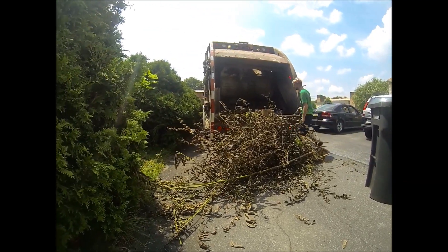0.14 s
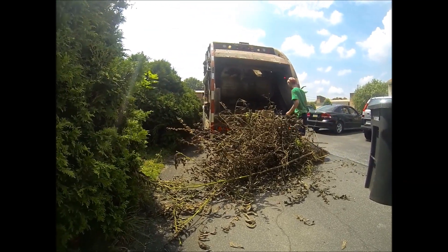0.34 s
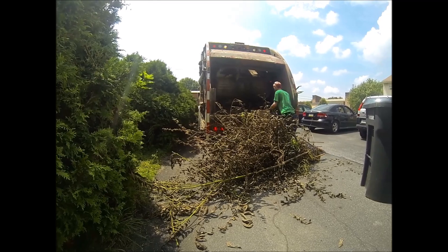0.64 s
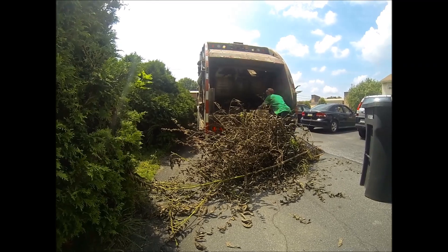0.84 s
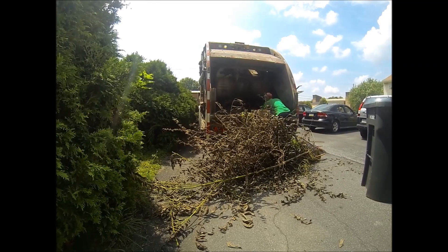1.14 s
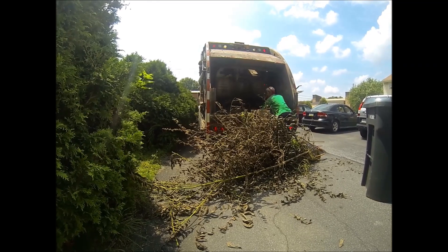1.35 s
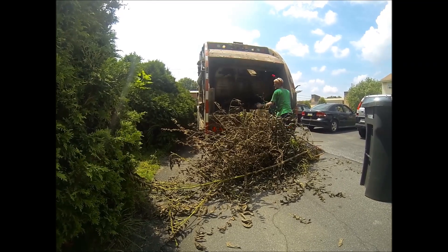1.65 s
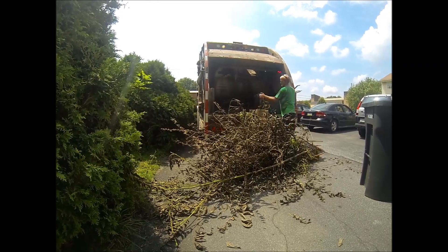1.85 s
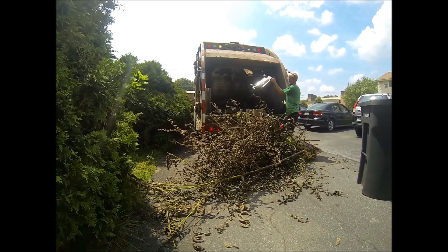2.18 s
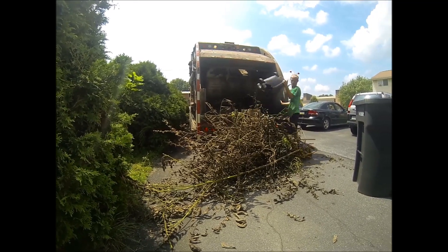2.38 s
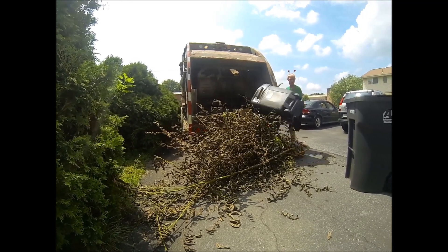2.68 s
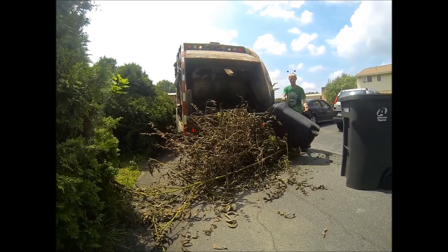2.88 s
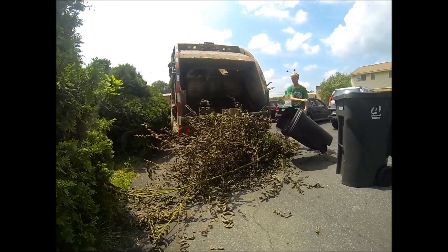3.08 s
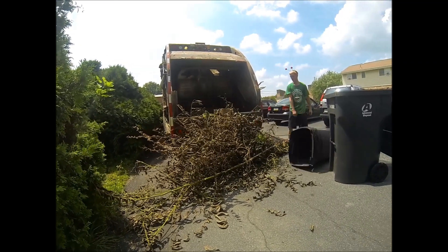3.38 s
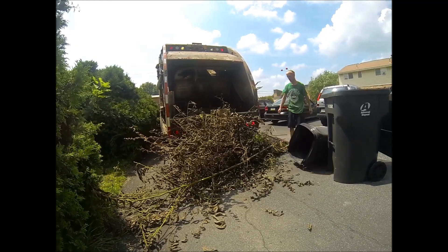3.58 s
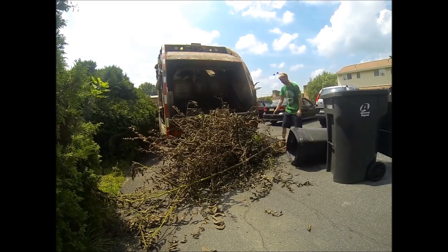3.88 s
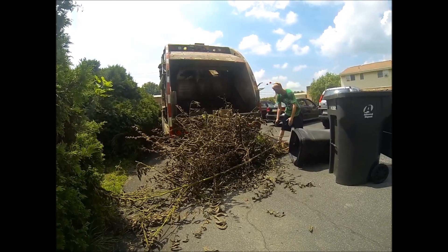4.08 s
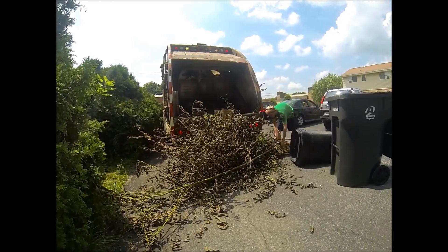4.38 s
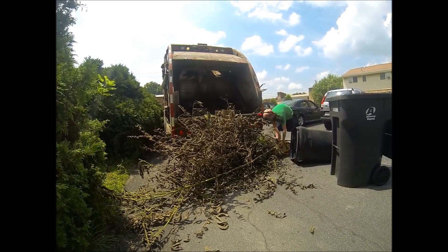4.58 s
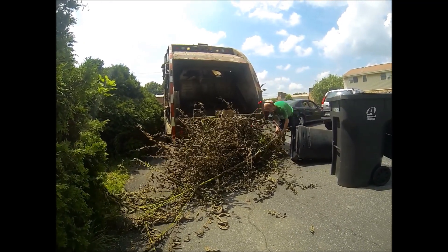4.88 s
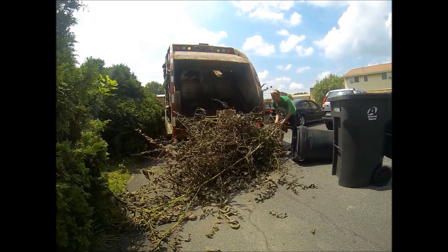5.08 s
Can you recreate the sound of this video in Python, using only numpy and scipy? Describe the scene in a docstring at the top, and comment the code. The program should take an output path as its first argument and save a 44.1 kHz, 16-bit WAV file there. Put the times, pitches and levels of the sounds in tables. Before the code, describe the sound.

A refuse truck idles with a steady low drone on a street. A plastic bin knocks a few times against its hopper, then hits the asphalt with one very loud slam and bounces and skids with hollow booms. The engine dips under the slam and swells back. Near the end, dry branches and leaves rustle and crackle as they are dragged. The microphone picks up a short outdoor echo.

```python
"""At the kerb of a street, a refuse truck idles behind a heap of cut brush and a cricket trills in the hedge.
A worker knocks a plastic bin empty against the hopper and throws it down: its thin wall slams, bounces
and skids on the asphalt and its hollow booms. He then drags brush together, leaves hissing, twigs snapping.
The slam makes a gain control duck the mix, and the engine's drone swells back slowly."""
import sys
import numpy as np
from scipy import signal
from scipy.fft import rfft, irfft, next_fast_len
from scipy.io import wavfile
from scipy.ndimage import uniform_filter1d, minimum_filter1d, map_coordinates

SR = 44100
rng = np.random.default_rng(int(sys.argv[2]) if len(sys.argv) > 2 else 0)


def store_pcm(level_fs):
    """Save levels as 16-bit WAV."""
    pcm = np.round(np.clip(level_fs, -1, 1) * 32767).astype(np.int16)
    wavfile.write(sys.argv[1], SR, np.atleast_2d(pcm).T)


N = 230728
TIME = np.arange(N) / SR


# the bin's hits on truck and ground: start_s, strength_db, extra_bass_db, extra_treble_db, thud_t60_s
BIN_HITS = [(0.88, -30, -7, 0, 0.17), (1.222, -25.5, -2.5, -8, 0.13), (1.244, -24.5, 1.5, -8, 0.15),
            (1.528, -34, 4, 6, 0.21), (2.725, -23, -10, -5, .1), (2.765, -17.5, -1, -1, 0.19),
            (2.8515, 10.5, -13.5, -8, 0.057), (2.902, -21, 14.5, 6, .22), (3.005, -23.5, 6, -5, .15),
            (3.212, -7, 4.5, 2, 0.17), (3.229, -6, 3.5, -5, 0.09), (3.273, -12.5, -2.5, 3, 0.24),
            (3.302, -9, 0, 3, 0.11), (3.382, -17, -5, 18, 0.071), (3.408, -19.5, 9.5, 8.5, 0.16),
            (3.472, -22, 5.5, 2, 0.25), (3.604, -23.5, 0, 7.5, 0.28), (3.667, -28, 7, 18.5, 0.16),
            (3.77, -28, 3.5, 10, 0.1), (3.825, -26.5, -2.5, 6.5, 0.19), (4.01, -26.5, 1.5, 2.5, 0.11)]
# low, mid and high layers of a hit: freq_hz, density_db
THUD_COLOUR = [(60, -36), (130, 8), (200, 6), (420, -1), (700, -6), (1200, -32.5), (3000, -63.5)]
CLACK_COLOUR = [(250, -36.5), (600, -13), (950, 2), (1350, -1.5), (1650, -2), (2050, -0.5), (2400, -16.5),
                (3200, -18), (5000, -36.5), (9000, -61)]
TICK_COLOUR = [(1200, -34.5), (2600, 10), (3600, 0.5), (4800, 1), (5600, -4), (7600, -11), (9300, -12),
               (12500, -19), (15000, -28)]
# resonances of the hollow bin: pitch_hz, level_db, t60_s
BIN_MODES = [(159, -8.5, .35), (188, -15, .2), (236, -12, .2), (291, 1.5, .18), (352, -16, .15),
             (490, -13, .18), (618, -6, .14), (943, -14, .14), (1310, -14, .12), (1800, -15, .1)]
# the bin scraping along: start_s, length_s, level_db
BIN_SLIDES = [(1.245, 0.038, -32), (1.44, 0.21, -36), (1.88, 0.26, -38), (2.67, 0.14, -36),
              (2.755, 0.15, -20.5), (2.9, 0.2, -26.5), (3.22, 0.25, -22), (3.45, .065, -28),
              (3.63, 0.078, -25)]
def plastic_bin(thud_db=7.0, clack_db=3.0, tick_db=-17.5, boom_db=8.0, skid_db=-1):
    """The thin wall thuds, clacks and ticks, heavy hits boom in the hollow, and the sliding rim grates."""
    starts, strength, bass, treble, _ = np.transpose(BIN_HITS)
    thud = wall_rattle(strength + bass, THUD_COLOUR, rng.standard_normal(N), t60_scale=1, softness=0.17)
    grit = grains(per_s=8000, spread_db=1)
    clack = wall_rattle(strength, CLACK_COLOUR, grit, t60_scale=0.72, softness=0.39)
    hiss = rng.standard_normal(N)
    tick = wall_rattle(strength + treble, TICK_COLOUR, hiss, t60_scale=0.84, softness=0.21)
    boom_hits = zip(starts, 1.95 * (strength + bass))  # the boom grows faster than the thud
    boom = ring(boom_hits, BIN_MODES, scatter_db=-1.0, attack_s=0.00073)
    slide = strokes(BIN_SLIDES, attack_s=0.0075, release_s=0.021)
    skid = slide * amp(2.2 * wobble(70)) * coloured(grains(per_s=2000, spread_db=1), CLACK_COLOUR)
    impacts = amp(thud_db) * thud + amp(clack_db) * clack + amp(tick_db) * tick
    return impacts + amp(boom_db) * boom + amp(skid_db) * skid


def wall_rattle(levels_db, colour, texture, t60_scale, softness):
    """One layer of the bin's hits: a dense rattle of the wall that dies away after each."""
    power, t = np.zeros(N), np.arange(SR // 2) / SR
    for (start_s, *_, t60_s), db in zip(BIN_HITS, levels_db):
        rise_s = softness * t60_s ** 2  # glancing hits last longer and build more slowly
        decay = amp(db - 60 * (t - rise_s) / (t60_s * t60_scale))
        add(power, start_s, (decay * (1 - np.exp(-t / rise_s))) ** 2)
    return np.sqrt(power) * coloured(texture, colour)


# chirps of rubbing plastic: centre_s, pitch_hz, level_db, half_length_s
PLASTIC_SQUEAKS = [(1.315, 3030, -45, 0.011), (1.47, 3230, -42, 0.014), (2.246, 1470, -31, 0.0073),
                   (2.69, 2040, -42, 0.01), (3.119, 1960, -18.5, 0.0041), (3.28, 1805, -10, 0.0056)]
def squeaks(waver=.04, overtone_db=-24):
    """Plastic sticks and slips in brief tones of unsteady pitch."""
    out = np.zeros(N)
    for centre_s, hz, db, half_length_s in PLASTIC_SQUEAKS:
        phase = wavering_phase(hz, waver, per_s=600)
        tone = unit(np.sin(phase) + amp(overtone_db) * np.sin(2 * phase))
        out += amp(db) * np.exp(-((TIME - centre_s) / half_length_s) ** 2) * tone
    return out


# knocks on the hopper's sill: start_s, level_db
SILL_KNOCKS = [(.910, -12.5), (.920, -16), (.940, -26)]
# resonances of the hopper: pitch_hz, level_db, t60_s
HOPPER_MODES = [(285, -8, .07), (404, 0, .075), (470, -8, .06), (560, -7, .08), (650, -11, .07),
                (1050, -17, .06)]
def hopper():
    """The hopper rings briefly as the bin strikes its sill."""
    return ring(SILL_KNOCKS, HOPPER_MODES, scatter_db=2.5, attack_s=0.00081)


# shoves against twigs and dry leaves: start_s, length_s, level_db
BRUSH_PUSHES = [(.88, 0.079, -61.5), (1.3, 0.65, -60), (1.44, 0.027, -55), (1.53, 0.11, -54),
                (1.75, 0.084, -52), (2.18, 0.072, -54), (2.4, 0.1, -59), (2.58, 0.082, -51.5),
                (2.68, 0.11, -43), (2.755, 0.11, -33.8), (2.88, .2, -50), (3.105, .08, -41),
                (3.285, .04, -41), (3.665, 0.027, -40)]
# swell of dragging the heap together: time_s, level_db
DRAG_SWELL = [(3.6, -63), (4.18, -60), (4.28, -54), (4.47, -54.5), (4.65, -43), (5, -41), (5.2, -35)]
# tone of lightly pushed leaves and of dragged twigs: freq_hz, density_db
LEAF_COLOUR = [(200, -15.5), (1100, 7.5), (2000, 8), (2600, 1), (3400, 1), (5500, -5.5), (7500, -12),
               (9300, -8.5), (12500, -18), (15000, -23)]
TWIG_COLOUR = [(200, -14.5), (500, -10), (1100, 8.5), (2000, 4.5), (2500, 0.5), (3300, 5), (4600, -4),
               (5500, -2.5), (6500, -10.5), (7900, -14), (9200, -10.5), (11500, -16), (12700, -20),
               (15000, -24)]
def brush(drag_db=5, push_db=4, snap_db=-11, clump_db=1, stir_db=-61.5):
    """Dry leaves hiss in clumps, light at a push and fuller in a drag, with twigs ticking among them."""
    push = amp(push_db) * strokes(BRUSH_PUSHES, attack_s=0.0093, release_s=.025)
    drag = amp(drag_db) * np.hypot(amp(curve(DRAG_SWELL)), amp(stir_db))  # the heap always stirs faintly
    crackle = grains(per_s=9000, spread_db=2.5) * amp(clump_db * wobble(60))
    rustle = push * coloured(crackle, LEAF_COLOUR) + drag * coloured(crackle, TWIG_COLOUR)
    return rustle + amp(snap_db) * np.hypot(push, drag) * twig_snaps()


def twig_snaps(centre_hz=2800, spread_octaves=1.1, decay_cycles=6, count=1200):
    """Each twig that gives way rings for a few cycles at its own pitch."""
    out, t = np.zeros(N), np.arange(SR // 25) / SR
    for when, pitch, size in rng.random((count, 3)):
        hz = centre_hz * 2 ** (spread_octaves * (2 * pitch - 1))
        add(out, when * N / SR, size ** 2 * np.sin(2 * np.pi * hz * t) * np.exp(-hz * t / decay_cycles))
    return unit(out)


# idle speed: time_s, firing_hz
IDLE_SPEED = [(0, 32.6), (.9, 33.4), (1.7, 33), (2.6, 33.2), (4, 33.14), (5.2, 33.2)]
# partials of the exhaust drone: firing_multiple, level_db
EXHAUST_ORDERS = [(1, -3), (1.5, -15.5), (2, 0), (2.5, -34), (3, 1.5), (3.5, -29), (4, -19), (4.5, -31.5),
                  (5, -58.5), (6, -1.5), (7, -22), (9, -19), (10, -29), (11, -29), (12, -23.5), (14, -32),
                  (15, -31)]
# noise bed of block, pump and fan: freq_hz, density_db
MACHINE_COLOUR = [(20, -6), (45, -4), (120, 4.5), (260, -5), (400, -11.5), (700, -19.5), (1030, -15.5),
                  (1250, -21), (1520, -19), (2100, -26.5), (2750, -36), (3500, -36), (7500, -63.5),
                  (15000, -73.5)]
def engine(drone_db=-14.5, machine_db=-26, pump_db=-50, pump_hz=1055, flutter_hz=14.0):
    """Exhaust pulses drone over machine noise that throbs with each firing, and a faint pump whine."""
    firing = wavering_phase(curve(IDLE_SPEED), 0.0021, per_s=7)
    dispersion = 1.11  # the pipe smears each pulse, evening the chug into a drone
    drone = sum(amp(db + 0.13 * wobble(21)) * np.cos(order * firing + dispersion * order ** 2)
                for order, db in EXHAUST_ORDERS)
    flutter = 0.14 * np.cos(2 * np.pi * flutter_hz * TIME)
    throb = 1 + 0.047 * np.cos(firing) + 0.047 * np.cos(2.5 * firing) + flutter
    machine = coloured(rng.standard_normal(N), MACHINE_COLOUR) * throb * amp(0.33 * wobble(8.5))
    pump = np.sin(wavering_phase(pump_hz, 0.023, per_s=90)) * amp(5.5 * wobble(25))
    return amp(machine_db) * machine + amp(pump_db) * unit(pump) - amp(drone_db) * unit(drone)


def cricket(stroke_hz=48, pitch_hz=6445, level_db=-70.2, overtone_db=-6):
    """Each wing stroke is a short, slightly unsteady tone."""
    stroke = np.maximum(np.sin(wavering_phase(stroke_hz, 0.011, per_s=6.7)), 0)
    phase = wavering_phase(pitch_hz, 0.0032, per_s=250)
    return amp(level_db) * unit(stroke * (np.sin(phase) + amp(overtone_db) * np.sin(2 * phase)))


# reverb time of the street: freq_hz, t60_s
STREET_DECAY = [(150, 1), (1500, 0.25), (5000, 0.11), (12000, .2)]
def street(x, predelay_s=.012):
    """The truck, cars and house fronts scatter a short tail."""
    hz, t, noise = signal.stft(rng.standard_normal(SR // 2), SR, nperseg=256)
    decay = amp(-60 * t / along(STREET_DECAY, hz)[:, None])
    tail = signal.istft(noise * decay, SR, nperseg=256)[1]
    delayed = np.pad(x, (int(predelay_s * SR), 0))
    return signal.fftconvolve(delayed, tail / np.linalg.norm(tail))[:N]


def ring(hits, modes, scatter_db, attack_s):
    """Each (start_s, level_db) hit rings the modes in a slightly new balance."""
    out, t = np.zeros(N), np.arange(SR // 2) / SR
    hz, mode_db, t60_s = np.transpose(modes)[:, :, None]
    for start_s, db in hits:
        decay = amp(db + mode_db + scatter_db * rng.standard_normal(hz.shape) - 60 * t / t60_s)
        add(out, start_s, (decay * np.sin(2 * np.pi * hz * t)).sum(0) * (1 - np.exp(-t / attack_s)))
    return out


def strokes(rows, attack_s, release_s):
    """Envelope of (start_s, length_s, level_db) gestures: each rises, holds and dies away."""
    power = np.zeros(N)
    for start_s, length_s, db in rows:
        t = np.maximum(TIME - start_s, 0)
        release = np.exp(-np.maximum(t - length_s, 0) / release_s)
        power += (amp(db) * (1 - np.exp(-t / attack_s)) * release) ** 2
    return np.sqrt(power)


def grains(per_s, spread_db):
    """Tiny fractures and slips of uneven size at random moments."""
    size = amp(spread_db * np.clip(rng.standard_normal(N), -2, 2))
    return unit((rng.random(N) < per_s / SR) * size * rng.choice([-1, 1], N))


def coloured(x, colour):
    """x through a (freq_hz, density_db) EQ curve, at rms 1."""
    size = next_fast_len(N + SR // 2)
    gain = amp(along(colour, np.fft.rfftfreq(size, 1 / SR)))
    return unit(irfft(rfft(x, size) * gain, size)[:N])


def wavering_phase(hz, depth, per_s):
    """Phase of a tone whose pitch wanders by about the fraction depth."""
    return 2 * np.pi * np.cumsum(hz * (1 + depth * wobble(per_s))) / SR


def wobble(per_s):
    """A smooth random curve with per_s knots a second."""
    return map_coordinates(rng.standard_normal(int(N * per_s / SR) + 4), [TIME * per_s])


def curve(rows):
    """(time_s, value) rows joined by straight lines."""
    return np.interp(TIME, *np.transpose(rows))


def along(points, hz):
    """(freq_hz, value) points read on a log axis."""
    freqs, values = np.transpose(points)
    return np.interp(np.log(hz + 1), np.log(freqs + 1), values)


def add(track, start_s, sound):
    """Mix a sound into a track at start_s."""
    part = track[round(start_s * SR):][:len(sound)]
    part += sound[:len(part)]


def amp(db):
    """Decibels to gain."""
    return 10 ** (np.asarray(db) / 20)


def unit(x):
    """Scale to rms 1."""
    return x / np.sqrt(np.mean(x ** 2) + 1e-20)


def scene(reverb_db=-13):
    """The work at the hopper with its street reverb, over the idling truck and the cricket."""
    work = plastic_bin() + squeaks() + brush() + hopper()
    return (work + amp(reverb_db) * street(work) + engine() + cricket())[None]


def gain_control(x, threshold_db=-2.5, range_db=16, release_db_per_s=12.0, lookahead_samples=220):
    """A peak over the threshold ducks the gain just ahead of it; the gain then creeps back."""
    excess_db = np.clip(20 * np.log10(np.abs(x) + 1e-9) - threshold_db, 0, range_db)
    ahead_db = -minimum_filter1d(-excess_db, 2 * lookahead_samples)
    recovery_db = release_db_per_s * TIME
    duck_db = np.maximum.accumulate(ahead_db + recovery_db) - recovery_db
    return x * amp(-uniform_filter1d(duck_db, lookahead_samples // 2))


def record(dry, top_hz=15200):
    """The mix is ducked, flattened at full scale, faded in and steeply low-passed."""
    fade_in = np.minimum(TIME / .004, 1)
    limited = np.clip(gain_control(dry[0]), -1, 1) * fade_in
    lowpass = signal.cheby1(12, .05, top_hz, fs=SR, output="sos")
    return signal.sosfiltfilt(lowpass, limited)[None]


dry = scene()
out = record(dry)
store_pcm(out)
```